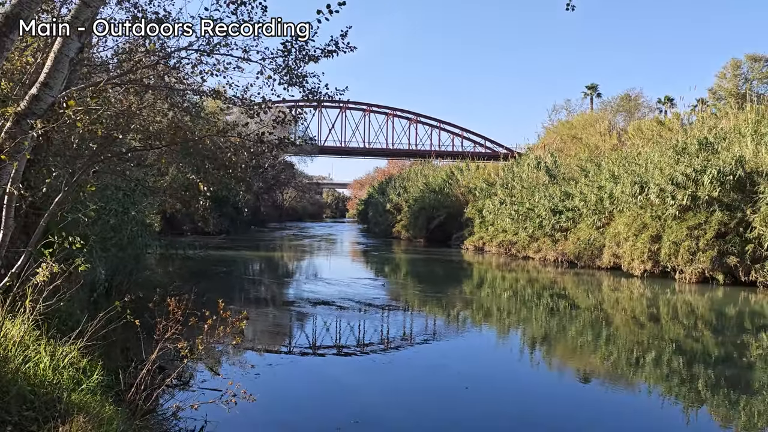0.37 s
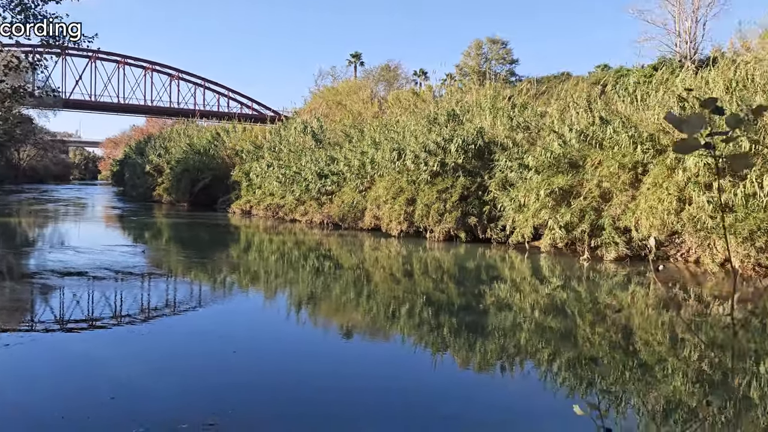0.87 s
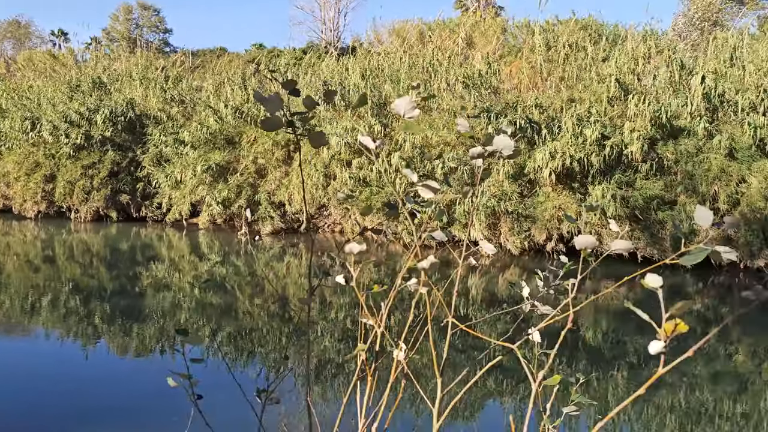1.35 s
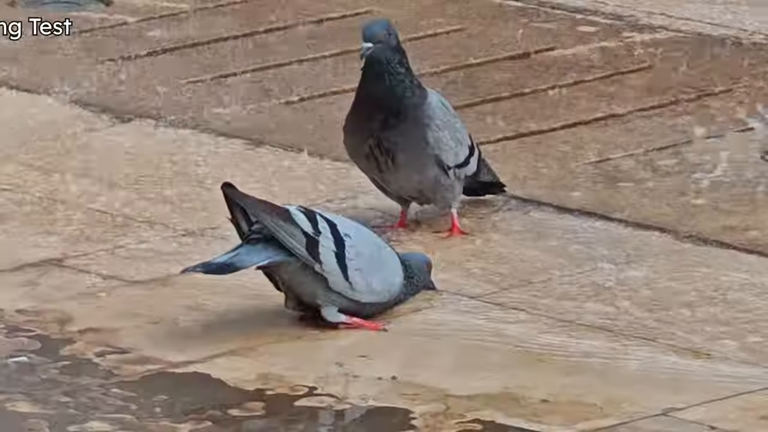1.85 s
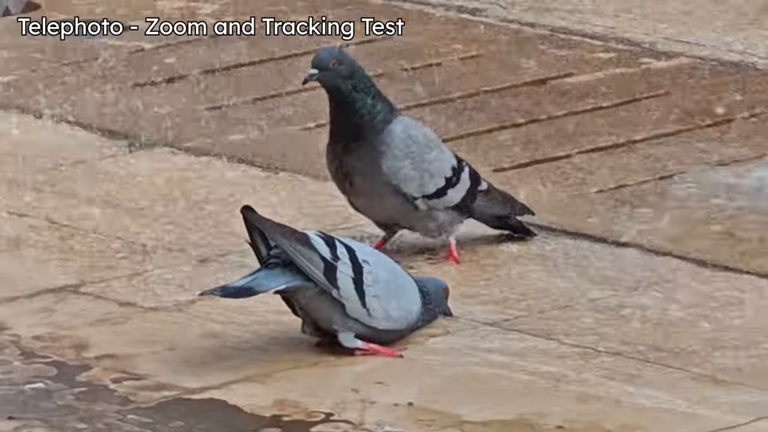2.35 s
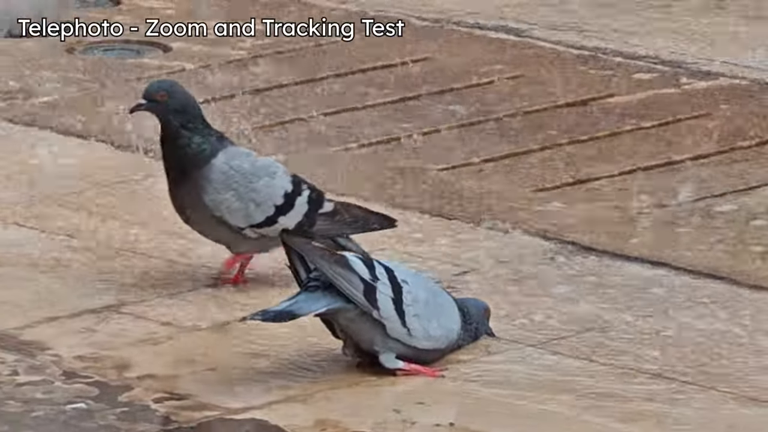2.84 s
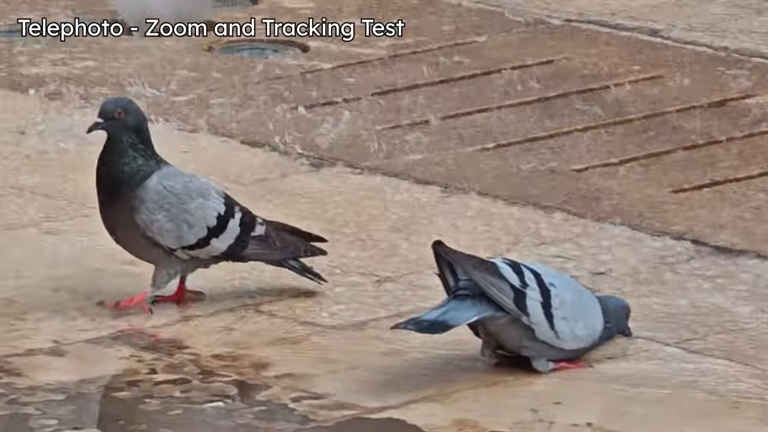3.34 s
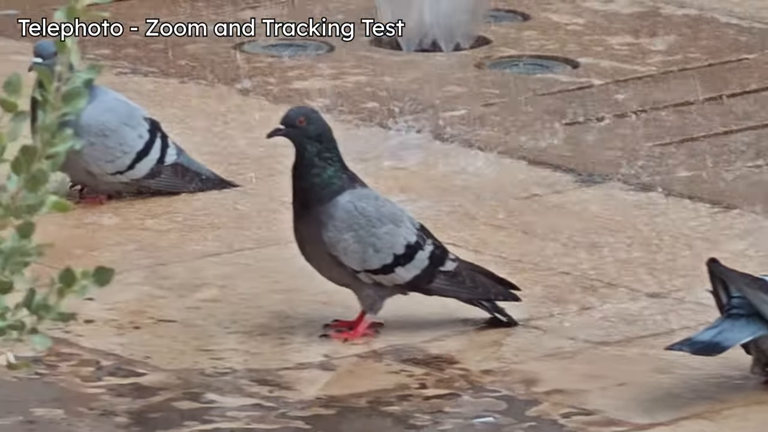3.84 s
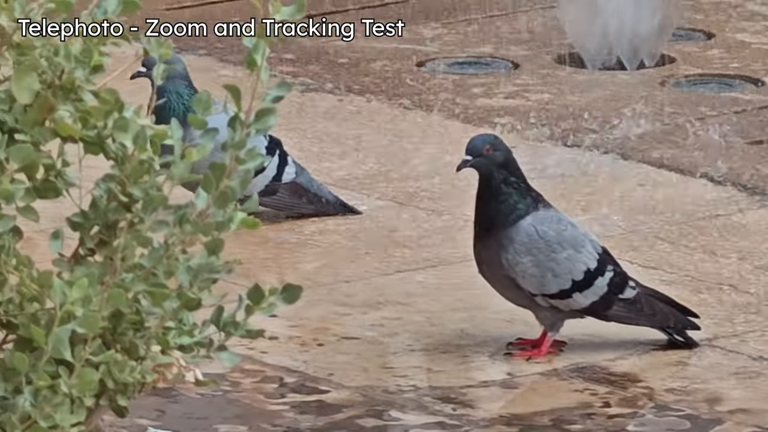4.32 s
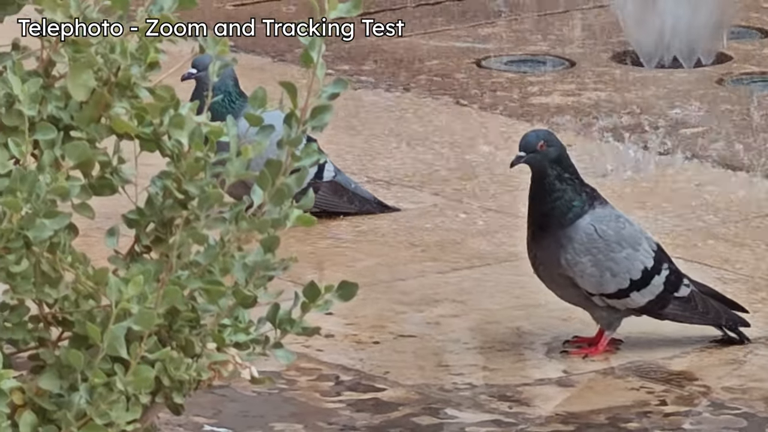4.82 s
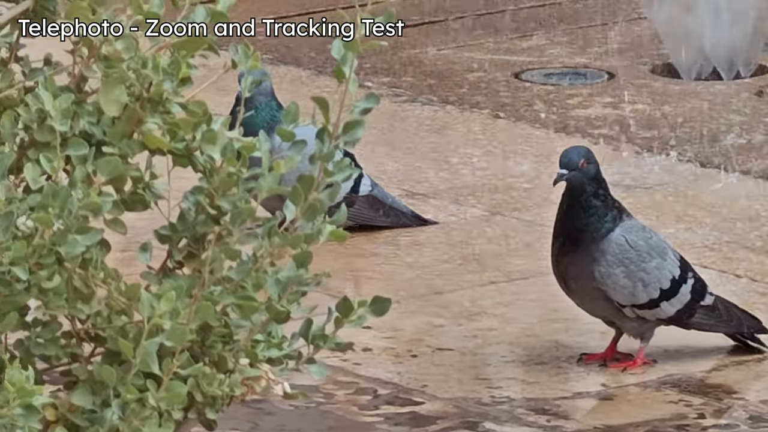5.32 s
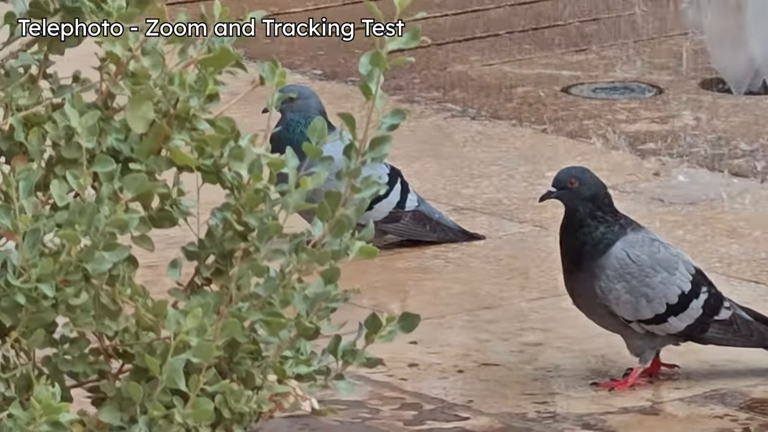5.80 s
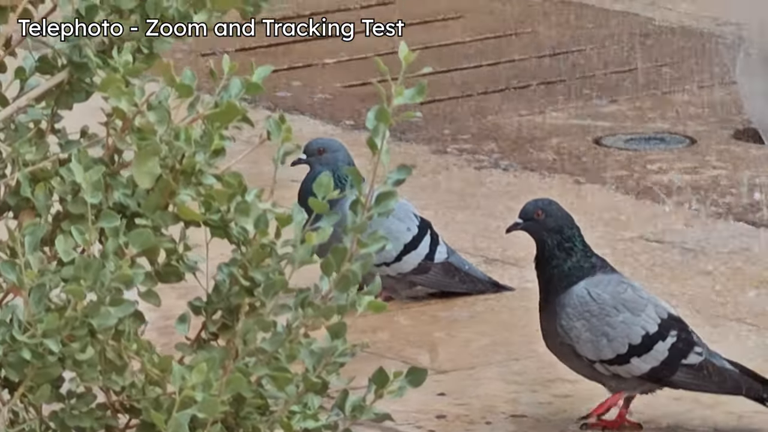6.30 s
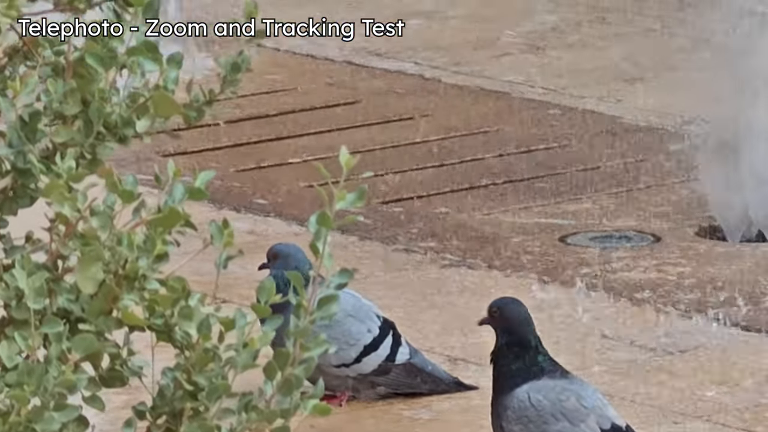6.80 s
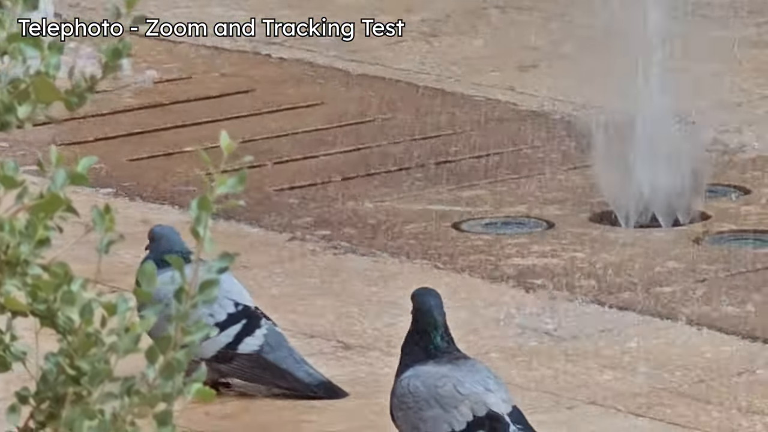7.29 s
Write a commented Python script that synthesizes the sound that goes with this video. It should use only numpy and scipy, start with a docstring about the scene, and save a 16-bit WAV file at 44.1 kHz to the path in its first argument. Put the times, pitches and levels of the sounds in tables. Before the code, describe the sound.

First, nearly two seconds of faint open air by water: soft rumble, one clear twig tick, brief water bird piping and harsh little chips, with slight echo from the reeds. Then a low knock and a fast swell into a plaza fountain, dense and constant to the end, dotted with bubble plops and wet slaps on paving, a dim motor hum beneath. Wide stereo microphone outdoors.

```python
"""Fountain jets fall on wet paving: random impacts and ringing bubbles form the fall, finer impacts the spray.
Single plops are rising bubble tones, slaps are noise bursts; pump and town hum as low noise with tones.
Before the plaza fades in, a quiet river bank is heard, then cut to a faint rest: far rumble, rustling leaves,
ticking twigs and water birds, made of filtered noise, resonated pulses and swept tones."""
import sys
import numpy as np
from scipy import signal
from scipy.fft import rfft, irfft, next_fast_len
from scipy.io import wavfile

SR = 44100
rng = np.random.default_rng(int(sys.argv[2]) if len(sys.argv) > 2 else 0)


def level_to_linear(level):
    """Convert decibel levels to linear amplitude factors, elementwise."""
    exponent = np.asarray(level, float) / 20
    return 10 ** exponent


def to_wav(sig):
    """Store sig (one row per channel, or 1-D mono) as 16-bit WAV at the path in sys.argv[1].

    Samples outside -1..1 are clipped; the rate is SR.
    """
    pcm = np.clip(np.atleast_2d(sig), -1, 1) * 32767
    pcm = np.round(pcm).astype(np.int16)
    wavfile.write(sys.argv[1], SR, pcm.T)  # frames by channels


N = 337890
TIME_S = np.arange(N) / SR
FADE_START_S, FADE_S = 1.833, 0.29   # the plaza fades in

# left-right correlation of the plaza's diffuse sound: [freq_hz, correlation (no unit)]
PLAZA_LIKENESS = [(60, 0.98), (99, 1), (160, 0.93), (270, 0.95), (450, 0.83), (740, 0.53), (1220, 0.56),
                  (2010, 0.42), (3330, 0.54), (5500, 0.63), (9080, 0.85), (15000, 0.97)]


def rms_one(x):
    """Normalisation to unit root-mean-square."""
    return x / np.sqrt(np.mean(x ** 2) + 1e-20)


def in_time(rows):
    """Linear interpolation of each column over the first column, time in s."""
    s, *columns = np.transpose(rows)
    return [np.interp(TIME_S, s, column) for column in columns]


def sounding(rows):
    """Gate: 1 between the first and last row of a table, else 0."""
    return (TIME_S > rows[0][0]) & (TIME_S < rows[-1][0])


def at_hz(points, hz):
    """Interpolation over logarithmic frequency."""
    points = np.array(points)
    return np.interp(np.log(hz), np.log(points[:, 0]), points[:, 1])


def swells(rows, width_s):
    """Bell-shaped changes in level, summed in dB."""
    return sum(db * np.exp(-.5 * ((TIME_S - s) / width_s) ** 2) for s, db in rows)


def drift(rate_hz):
    """Slow random modulation: noise through two equal low-pass poles at rate_hz; rms 1."""
    r = np.exp(-80 * np.pi * rate_hz / SR)
    noise = rng.standard_normal(N // 40 + 2002)   # one value per 40 samples
    slow = signal.lfilter([1], [1, -2 * r, r * r], noise)[2000:]
    return np.interp(np.arange(N) / 40, np.arange(len(slow)), rms_one(slow))


def resonance(x, hz, width_hz):
    """Two-pole resonance: a damped mode with gain 1 on top."""
    r = np.exp(-np.pi * width_hz / SR)
    zeros = [(1 - r * r) / 2, 0, (r * r - 1) / 2]
    poles = [1, -2 * r * np.cos(2 * np.pi * hz / SR), r * r]
    return signal.lfilter(zeros, poles, x + 1e-18)


def coloured(pair, spectrum, likeness):
    """Spectral shaping of two unrelated sources, mixed to a set left-right correlation; rms 1."""
    size = next_fast_len(N)
    hz = np.maximum(np.arange(size // 2 + 1) * SR / size, 1)
    mid, side = rfft(pair, size) * level_to_linear(at_hz(spectrum, hz))
    alike = np.clip(at_hz(likeness, hz), -1, 1)
    stereo = np.sqrt(1 + alike) * mid + np.sqrt(1 - alike) * side * [[1], [-1]]
    return rms_one(irfft(stereo, size)[:, :N])


def add(out, s, sound, pan_db):
    """Superposition of one event at s, with a left-minus-right level of pan_db."""
    i = round(s * SR)
    out[:, i:i + len(sound)] += sound[:N - i] * level_to_linear([[pan_db / 2], [-pan_db / 2]])


def impacts(per_s, spread_db, noise_share):
    """Random drop impacts of very unequal size over a noise bed of those too dense to part; two draws."""
    sizes = level_to_linear(spread_db * np.minimum(rng.exponential(1, (2, N)), 5)) * rng.choice([-1, 1], (2, N))
    clicks = rms_one(sizes * (rng.random((2, N)) < per_s / SR))
    share = np.clip(noise_share, 0, 1)   # of the power
    return np.sqrt(1 - share) * clicks + np.sqrt(share) * rng.standard_normal((2, N))


def bubble(hz, cycles, rise, attack=0.105):
    """Bubble resonance: a sine losing 60 dB, its pitch climbing near the surface; attack in cycles."""
    turns = np.arange(int(cycles * SR / hz)) * hz / SR
    tone = np.sin(2 * np.pi * turns * (1 + rise * turns / cycles))
    return tone * level_to_linear(-60 * turns / cycles) * np.minimum(turns / attack, 1)


def bubbles(per_s, cycles, spread_db):
    """Volume resonance: air dragged under rings briefly at 16 pitches from 700 to 7500 Hz; two draws."""
    sizes = level_to_linear(spread_db * np.minimum(rng.exponential(1, (2, N)), 4))
    starts = sizes * (rng.random((2, N)) < per_s / SR)
    dealt = rng.integers(0, 16, (2, N))
    pitches_hz = np.geomspace(700, 7500, 16)
    return rms_one(sum(resonance(starts * (dealt == k), hz, hz / cycles) for k, hz in enumerate(pitches_hz)))


def jets():
    """Jet break-up: columns part unevenly, so the fall gushes and throbs; spray also flickers on its own."""
    # spectra of the fall and of the fine spray: [freq_hz, relative density_db per Hz]
    splash_spectrum = [(300, -41), (450, -18.5), (560, -20.5), (664, -16.5), (853, -9), (1040, -7),
                       (1580, -11), (2050, -3), (2720, -1.5), (3100, -5.5), (3600, -3), (4050, -6),
                       (4570, -3.5), (5590, -8.5), (6830, -7.5), (7550, -13), (9000, -14.5), (11700, -31.5)]
    spray_spectrum = [(3820, -15), (6500, -1), (8570, -6.5), (10700, -3.5), (13000, -5), (14000, -5),
                      (14900, -7.5)]
    # flow of the jets: [time_s, level_db]
    flow = [(1.83, -38), (3.0, -38), (3.7, -38), (4.1, -37), (5.0, -37), (6.0, -36.5), (6.8, -36.5),
            (7.66, -36.5)]
    # gushes, when a column collapses in one lump, and one lull: [time_s, db above the flow]
    gushes = [(1.862, 4), (1.945, 3.5), (1.99, 2.5), (2.038, 5), (2.238, 1.5), (2.306, 1.5), (2.66, 2.7),
              (2.85, 1.2), (3.467, 2), (3.698, -1.5), (3.859, 2.5), (4.3, 0), (4.467, 2), (4.91, 0.5),
              (5.18, 1.5), (5.45, 1.2), (5.621, 2.5), (6.42, 1), (6.748, 2), (6.98, 0.5), (7.612, 1)]
    flow_db, = in_time(flow)
    faded_in_s = FADE_START_S + FADE_S
    early = [g for g in gushes if g[0] < faded_in_s]
    late = [g for g in gushes if g[0] >= faded_in_s]
    gush_db = swells(early, width_s=0.0082) + swells(late, width_s=0.013)
    throb_db = 0.62 * drift(9.0) + 0.55 * drift(42)
    water = impacts(6000, spread_db=1.5, noise_share=0.61) + 0.33 * bubbles(2000, cycles=6.6, spread_db=3.0)
    fall = level_to_linear(flow_db + gush_db + throb_db) * coloured(water, splash_spectrum, PLAZA_LIKENESS)
    grains = impacts(4000, spread_db=3.5, noise_share=0.69)
    flicker_db = 0.57 * drift(12.0) + 0.73 * drift(38)
    spray_db = flow_db - 3 + 0.13 * gush_db + 0.4 * throb_db + flicker_db
    return fall + level_to_linear(spray_db) * coloured(grains, spray_spectrum, PLAZA_LIKENESS)


def plops():
    """Bubble resonance: big drops ring as rising bubbles."""
    out = np.zeros((2, N))
    # plops of big drops: [start_s, level_db, pitch_hz]
    big_drops = [(2.032, -37, 1550), (2.037, -30.5, 2680), (2.861, -29, 2770), (3.135, -31, 1100),
                 (3.319, -33, 2780), (3.914, -37, 2730), (4.062, -35, 2620), (4.131, -27.5, 2700),
                 (4.472, -30, 2350), (5.359, -32, 2510), (5.445, -31.5, 1750), (5.753, -31, 2600),
                 (6.011, -32, 934), (6.145, -33, 2610), (6.296, -32, 2340), (6.419, -30, 1340),
                 (6.704, -27, 2580), (6.744, -27, 2490), (7.094, -34, 1690), (7.543, -32, 1020),
                 (7.609, -33, 3020)]
    t60_s = .019
    for (s, level_db, hz), pan_db in zip(big_drops, rng.normal(0, 1, len(big_drops))):
        add(out, s, level_to_linear(level_db) * bubble(hz, cycles=t60_s * hz, rise=0.075, attack=1.2), pan_db)
    return out


def slaps():
    """Impact noise: water slapping bare stone gives short, dying bursts of banded noise."""
    out, t = np.zeros((2, N)), np.arange(int(.02 * SR)) / SR
    # slaps on bare stone: [start_s, level_db (rms before the decay), centre_hz]
    stone_slaps = [(2.304, -30, 4600), (3.862, -28, 5000), (4.684, -30.5, 4570), (5.468, -27, 2400),
                   (5.976, -29, 6000), (6.231, -32, 9000), (6.336, -29, 4130), (6.75, -30, 11000),
                   (6.828, -27, 8500), (7.207, -32, 3830), (7.377, -26, 3540)]
    for s, level_db, hz in stone_slaps:
        burst = rms_one(resonance(rng.standard_normal(len(t)), hz, 0.43 * hz))
        add(out, s, level_to_linear(level_db) * burst * level_to_linear(-60 * t / 0.015), 0)
    return out


def knock():
    """Damped mode: a finger knocks on a housing, which rings briefly and low."""
    out, start_s, level_db, hz, t60_s = np.zeros((2, N)), 1.899, -36.5, 89, 0.07
    add(out, start_s, level_to_linear(level_db) * bubble(hz, cycles=hz * t60_s, rise=0), 0)
    return out


def croak():
    """Source and filter: a water bird's uneven pulses excite the throat; the open bill adds upper modes."""
    # course of the croak: [time_s, level_db, bill opening as treble_db]
    course = [(.03, -78, -12), (.036, -59, -14), (.05, -55, -18), (.055, -64, 6), (.061, -53.5, 6),
              (.068, -53, -19), (.077, -73, 2), (.104, -71, -2), (.112, -80, 0)]
    # resonances of throat and bill: [freq_hz, width_hz, relative level_db]
    throat_modes = [(350, 69, -5), (1180, 150, 8)]
    bill_modes = [(1750, 150, -5), (1980, 140, -1)]
    high_hz, low_hz, slur_s, slur_width_s = 440, 350, .052, 0.0055   # pitch drops in one slur
    level_db, treble_db = in_time(course)
    slur = .5 + .5 * np.tanh((TIME_S - slur_s) / slur_width_s)
    pitch_hz = high_hz + (low_hz - high_hz) * slur
    turns = np.cumsum(pitch_hz * (1 + 0.035 * drift(150))) / SR
    pulses = np.diff(np.floor(turns), prepend=0)   # one pulse per full turn

    def ring(modes):
        """Parallel modes, each of two resonances in series; rms 1."""
        return rms_one(sum(level_to_linear(db) * resonance(resonance(pulses, hz, w), hz, w) for hz, w, db in modes))

    return level_to_linear(level_db) * (ring(throat_modes) + level_to_linear(treble_db) * ring(bill_modes)) * sounding(course)


def piping():
    """Frequency modulation: a water bird's nearly pure tones; roughness shakes pitch and level."""
    # four notes, one list each: [time_s, pitch_hz, level_db, roughness (0 to 2, no unit)]
    notes = [
        [(1.425, 1970, -75, 0.091), (1.43, 1990, -51, 0.2), (1.437, 2100, -59, .1), (1.441, 2400, -68, .4),
         (1.458, 2490, -64, .4)],
        [(1.459, 2170, -68, .1), (1.466, 2020, -50, 0.23), (1.484, 2190, -60, 0.14), (1.497, 2020, -50, .13),
         (1.505, 1780, -56, 0.2), (1.509, 1700, -68, .1)],
        [(1.595, 1450, -80, 0.46), (1.602, 1500, -67, 0.45), (1.612, 1440, -77, .7), (1.62, 1750, -76, .9),
         (1.64, 1750, -77, .9)],
        [(1.752, 4280, -82, .1), (1.759, 4200, -77, .5), (1.77, 4100, -82, .1)],
    ]
    out = 0
    for note in notes:
        pitch_hz, level_db, rough = in_time(note)
        shaken_hz = pitch_hz * (1 + 0.17 * rough * drift(300))
        tone = np.sqrt(2) * np.sin(2 * np.pi * np.cumsum(shaken_hz) / SR)   # rms 1
        out = out + level_to_linear(level_db + 8.4 * rough * drift(150)) * tone * sounding(note)
    return out


def small_bird():
    """Source and filter: a harsh tone swung fast over one range is loudest where the throat resonates."""
    out, t = np.zeros((2, N)), np.arange(int(0.039 * SR)) / SR
    # chips of a small bird: [time_s, level_db, loudest_hz, left minus right pan_db]
    chips = [(.916, -76, 7200, 1), (1.09, -80, 6860, 4), (1.394, -60, 5640, 5), (1.473, -58.5, 6000, -2),
             (1.538, -57.5, 5920, -3), (1.608, -62, 6200, -5), (1.686, -62, 6560, 1)]
    voice = signal.butter(3, [4700, 7200], "band", fs=SR, output="sos")
    for (s, level_db, hz, pan_db), phase in zip(chips, rng.random(len(chips))):
        swing_hz = 5750 + 1050 * np.sin(2 * np.pi * (135 * t + phase))
        harsh = np.sin(2 * np.pi * np.cumsum(swing_hz) / SR) + 1.3 * rng.standard_normal(len(t))
        chip = 0.95 * signal.sosfilt(voice, harsh) + 2.4 * resonance(resonance(harsh, hz, 450), hz, 450)
        edge = 0.5 * resonance(resonance(harsh, 7900, 500), 7900, 500) * (t < .016)   # bright onset
        add(out, s - .011, level_to_linear(level_db) * (chip + edge) * np.hanning(len(t)) ** 2.9, pan_db)
    return out


def twigs():
    """Damped modes: each dry tick is a brief ring and a higher snap."""
    out = np.zeros((2, N))
    # twigs ticking: [start_s, level_db, pitch_hz, snap_db, left minus right pan_db]
    ticks = [(.229, -49, 450, -51, -4), (.635, -38.5, 1260, -61, 2), (.730, -75, 1500, -66, 0),
             (.753, -75, 1500, -66, .5), (1.152, -66, 1200, -68, 1.5)]
    for s, level_db, hz, snap_db, pan_db in ticks:
        add(out, s, level_to_linear(level_db) * bubble(hz, cycles=5.0, rise=0, attack=.35), pan_db)
        add(out, s, level_to_linear(snap_db) * bubble(2900, cycles=5.8, rise=0), pan_db)
    return out


def reeds_echo(x, t60, level_db):
    """Scattering from reeds and the far bank: convolution with dying noise, other on each side; t60 in s."""
    t = np.arange(int(.35 * SR)) / SR
    tail = rng.standard_normal((2, len(t))) * level_to_linear(-60 * t / t60) * (t > .004)
    tail = tail / np.sqrt(np.sum(tail[0] ** 2))
    return level_to_linear(level_db) * signal.fftconvolve(x, tail, axes=1)[:, :N]


def wavering_tone(hz):
    """Random modulation: a motor tone wanders a little in pitch and swells and fades."""
    wandering_hz = hz * (1 + .015 * drift(1.458))
    return level_to_linear(2.0 * drift(2.9)) * np.sin(2 * np.pi * np.cumsum(wandering_hz) / SR)


def town():
    """Tones in noise: pump and far engines give broad low noise with wavering tones, swelling now and then."""
    # spectra of deep hum and town drone: [freq_hz, relative density_db per Hz]
    spectra = [(15, -48), (25, -20), (59, -3.5), (97, -3.5), (113, -5), (140, -14), (160, -21), (210, -46),
               (350, -120)], [(82, -28), (140, -6), (216, -3), (280, 0.5), (387, 1.5), (440, 0), (500, -11.5),
                            (560, -23), (780, -50), (1320, -120)]
    # motor tones in hum and drone: [freq_hz, amplitude_db against the noise rms]
    tone_sets = [(72, -16), (100, -2.5), (114, -5)], [(287, -10.5), (328, -17), (388, -12.5)]
    # levels, a row each for hum and drone: [first_db, gain_db per s, random swing_db, swing rate_hz]
    levels = [(-57.5, 0.3, 0.7, 3.9), (-58.5, 0.23, 2, 5.0)]
    # swells, a list each for hum and drone: [time_s, rise_db]
    rise_sets = [
        [(3.16, 3), (3.65, 3.5), (3.85, 4), (4.31, 3.5), (4.5, 2), (4.72, 3.5), (5.95, 5), (6.2, 3.5),
         (6.4, 3.5), (6.83, 2.5), (7.34, 4), (7.66, -1)],
        [(1.95, 9), (2.54, 1.5), (2.97, 2.5), (3.75, 3.5), (4.31, 8.5), (4.7, 4), (4.9, 0), (5.11, 3.5),
         (5.6, 3.5), (5.95, 3), (6.4, 4), (6.75, 1.5), (7.46, 0.5), (7.66, 4)],
    ]
    out, since_s = 0, TIME_S - FADE_START_S
    for level, rises, spectrum, tones in zip(levels, rise_sets, spectra, tone_sets):
        first_db, gain_db, swing_db, rate_hz = level
        level_db = first_db + gain_db * since_s + swells(rises, width_s=0.063) + swing_db * drift(rate_hz)
        noise = coloured(rng.standard_normal((2, N)), spectrum, PLAZA_LIKENESS)
        motors = sum(level_to_linear(db) * wavering_tone(hz) for hz, db in tones)
        out = out + level_to_linear(level_db) * rms_one(noise + motors)
    return out


def far_rumble(likeness):
    """Shaped noise: far traffic and wind rumble, swelling slowly."""
    # spectrum of the rumble: [freq_hz, relative density_db per Hz]
    spectrum = [(15, -49), (25, -10), (48, 3.5), (81, -8.5), (118, -6), (140, -24), (250, -33), (320, -61),
                (550, -120)]
    # swells of the rumble: [time_s, rise_db]
    rises = [(.41, 1), (.9, 4.5), (1.73, -0.5)]
    level_db = -63 + swells(rises, width_s=0.078) + 1.5 * drift(11.0)
    return level_to_linear(level_db) * coloured(rng.standard_normal((2, N)), spectrum, likeness)


def open_air(likeness):
    """Shaped noise: the open air, rising a little twice."""
    # spectrum of the air: [freq_hz, relative density_db per Hz]
    spectrum = [(90, -44), (150, -4.5), (283, -6.5), (554, -15), (900, -11.5), (1490, -16.5), (3940, -24.5),
                (8000, -30), (12400, -44), (13200, -60)]
    # rises of the air: [time_s, rise_db]
    rises = [(.64, 1.5), (1.47, 2.6)]
    level_db = -71 + swells(rises, width_s=0.046) + 1.8 * drift(17)
    return level_to_linear(level_db) * coloured(rng.standard_normal((2, N)), spectrum, likeness)


def leaves(likeness):
    """Granular friction: leaves rustle in grains as one gust swells, sinks slowly and drops off."""
    # spectrum of the rustle: [freq_hz, relative density_db per Hz]
    spectrum = [(6500, -26), (8000, -6), (9200, -2), (10800, -8), (12000, -11), (12800, -20), (15200, -40)]
    top_s, end_s, top_db = 0.65, 0.81, -74.5
    rise_db_per_s, sag_db_per_s, drop_db_per_s = 130, 45, 300   # the drop adds to the sag
    gust_db = top_db - rise_db_per_s * np.maximum(top_s - TIME_S, 0)
    gust_db = gust_db - sag_db_per_s * np.maximum(TIME_S - top_s, 0)
    gust_db = gust_db - drop_db_per_s * np.maximum(TIME_S - end_s, 0)
    grains = impacts(900, spread_db=5.0, noise_share=0.67)
    return level_to_linear(gust_db + 1.8 * drift(25)) * coloured(grains, spectrum, likeness)


def bank_air():
    """Superposition of rumble, air and leaves with one stereo correlation."""
    # left-right correlation on the river bank: [freq_hz, correlation (no unit)]
    likeness = [(60, 0.99), (180, 0.94), (550, 0.78), (1650, 0.62), (4970, 0.47), (15000, 0.99)]
    return far_rumble(likeness) + open_air(likeness) + leaves(likeness)


def hiss_bands():
    """Band-limited noise: thin fading hiss high in the air, other on each side."""
    # bands of hiss: [centre_hz, width_hz of each of two resonances, level_db at 0 s, loss_db per s]
    bands = [(5000, 550, -80, 11), (11400, 1500, -82.5, 18)]
    out = 0
    for hz, width_hz, db, loss_db in bands:
        noise = rng.standard_normal((2, N))
        band = rms_one(resonance(resonance(noise, hz, width_hz), hz, width_hz))
        out = out + level_to_linear(db - loss_db * TIME_S) * band
    return out


def scene():
    """Superposition: the bank is cut to a faint rest that lingers until the plaza has faded in."""
    cut_s, after_cut_db, fade_power = 1.822, -12, 0.79
    near, far = croak() + piping() + twigs(), small_bird()
    bank = bank_air() + hiss_bands() + near + reeds_echo(near, t60=0.15, level_db=-9.0)
    bank = bank + far + reeds_echo(far, t60=.6, level_db=-2.0)
    fade = np.clip((TIME_S - FADE_START_S) / FADE_S, 0, 1) ** fade_power
    bank_gain = np.where(TIME_S < cut_s, 1, level_to_linear(after_cut_db) * (1 - fade))
    return bank * bank_gain + (jets() + town()) * fade + plops() + slaps() + knock()


def band_limit(x):
    """A steep low-pass at the top of the band."""
    return signal.sosfilt(signal.butter(12, 16080, fs=SR, output="sos"), x)


def record(dry):
    """Linear filtering: the microphone drops the deepest bass; the top is cut steeply."""
    bass_cut = signal.butter(2, 36, "high", fs=SR, output="sos")
    top_cut = signal.ellip(12, .2, 90, 14880, fs=SR, output="sos")
    mix = signal.sosfilt(np.vstack([bass_cut, top_cut]), dry)
    return band_limit(mix)


dry = scene()
out = record(dry)
to_wav(out)
```